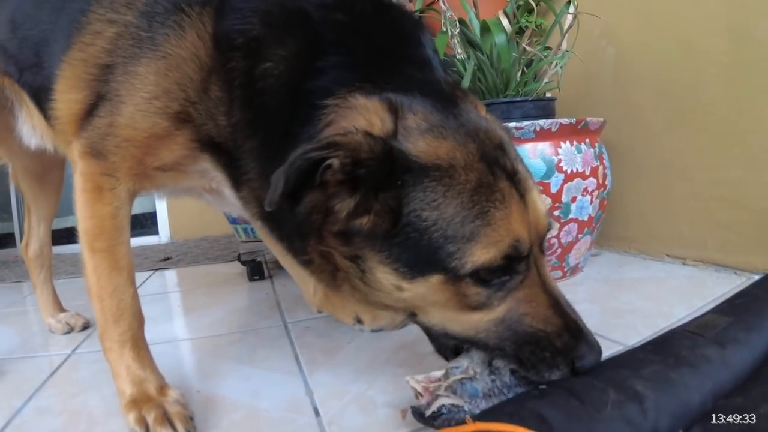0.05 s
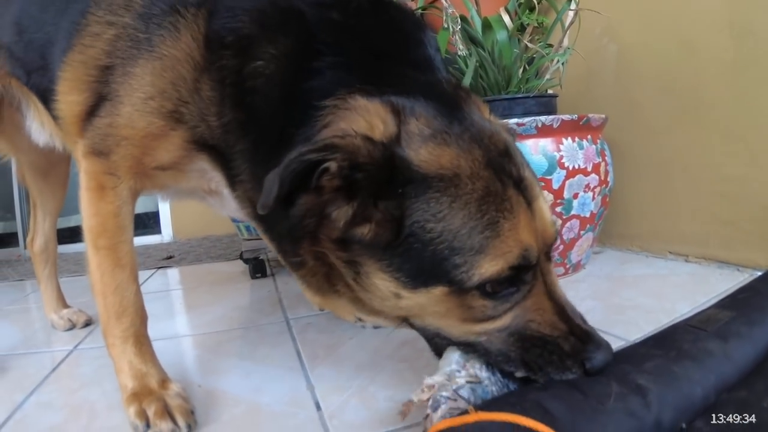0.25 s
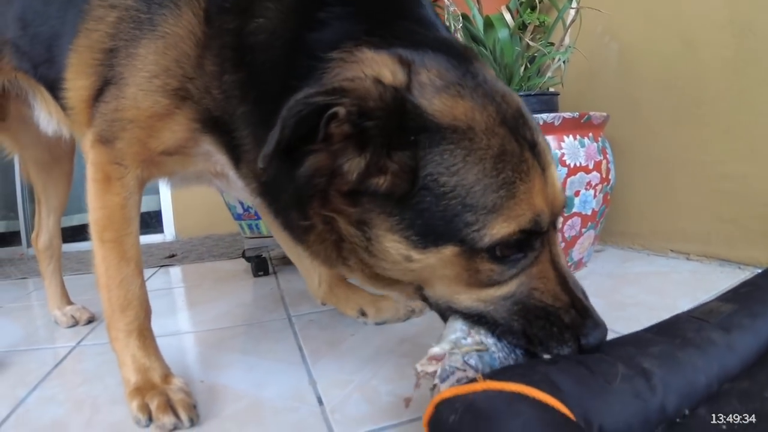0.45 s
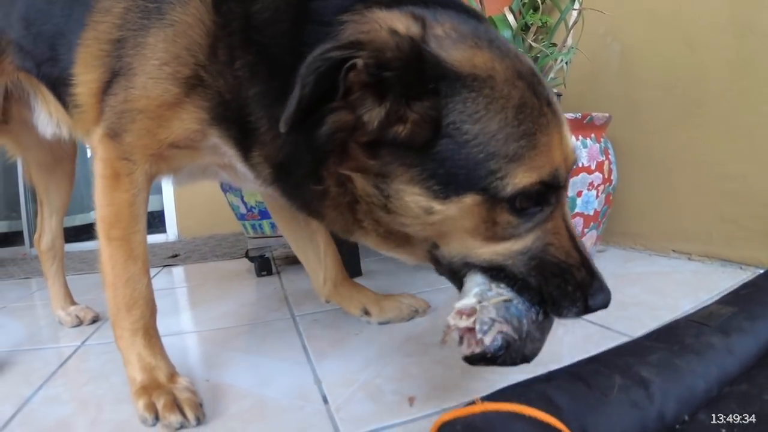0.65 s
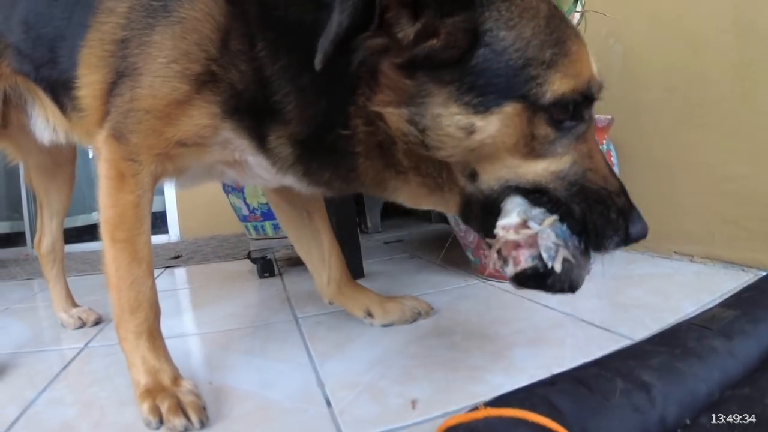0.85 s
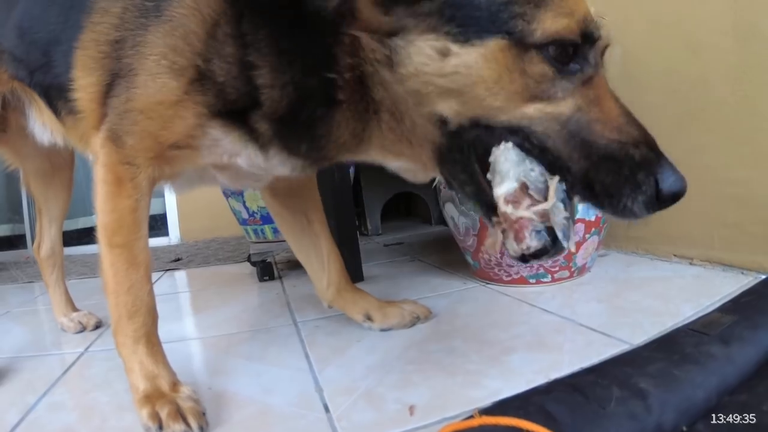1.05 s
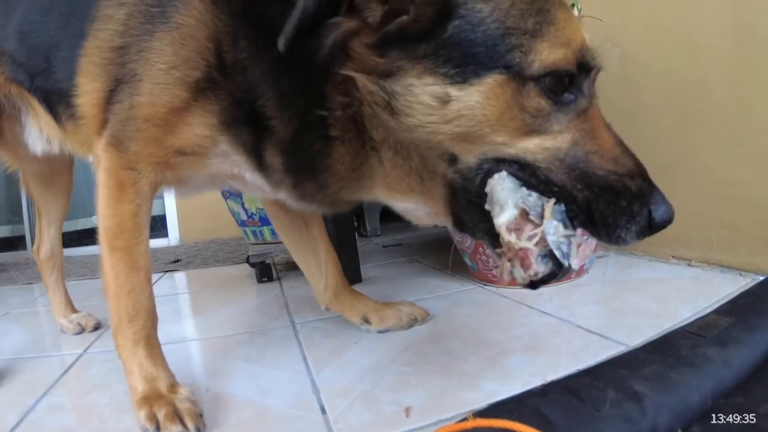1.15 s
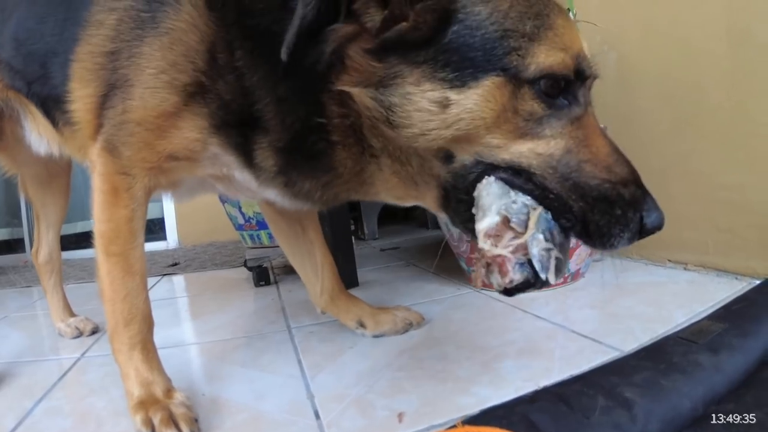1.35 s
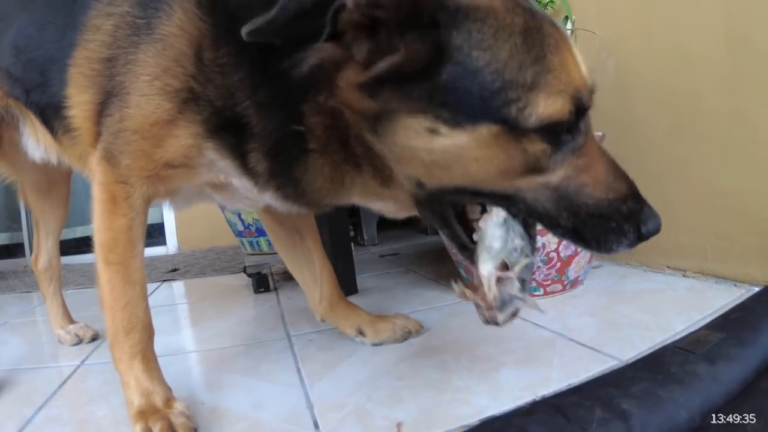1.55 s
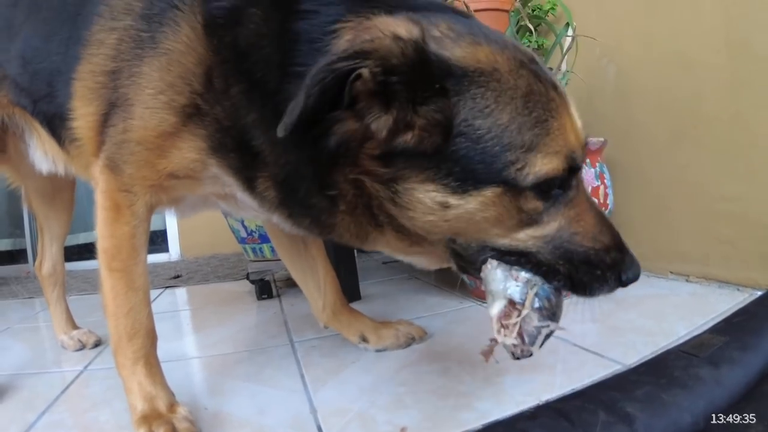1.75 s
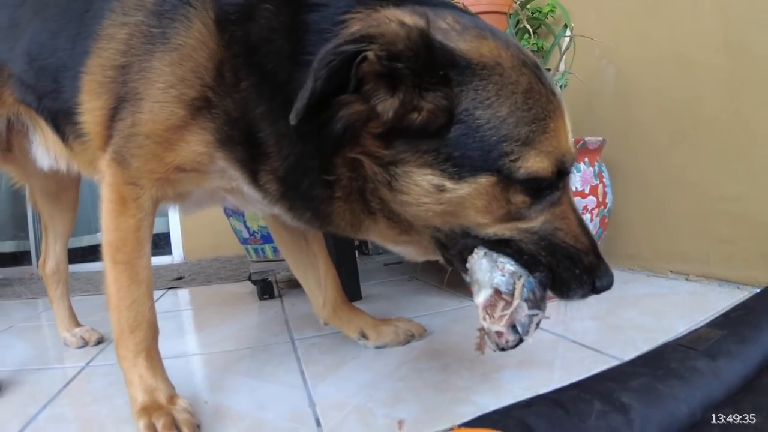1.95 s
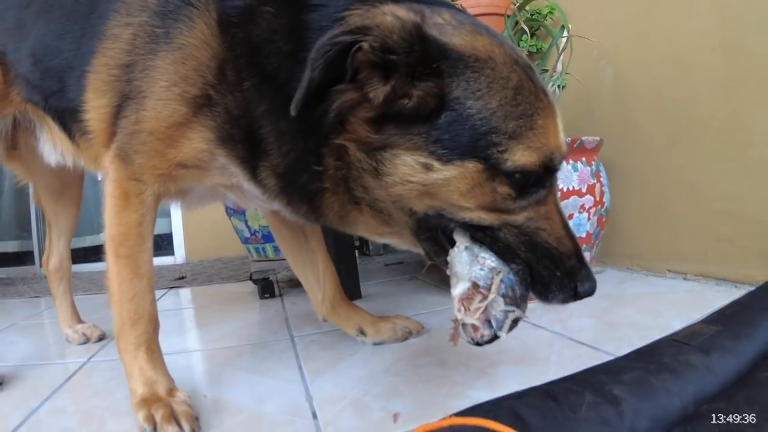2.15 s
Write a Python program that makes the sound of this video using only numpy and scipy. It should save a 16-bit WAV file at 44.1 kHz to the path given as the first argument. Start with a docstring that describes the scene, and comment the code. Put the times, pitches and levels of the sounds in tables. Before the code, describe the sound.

Close crunching and wet squelching as a dog chews through a raw fish.

```python
"""Dog crunching a raw fish

A dog chews a whole fish close by on a tiled patio, over outdoor air and a far hum. Each bite is a
brittle fracture of bone: a crack, a thud of jaw and flesh, and two damped resonances of the mouth.
Between bites wet flesh slides, tears and clicks. The walls reflect it; the hardest snaps clip."""
import sys
import numpy as np
from scipy import signal
from scipy.fft import rfft, irfft, next_fast_len
from scipy.io import wavfile

SR = 44100
rng = np.random.default_rng(int(sys.argv[2]) if len(sys.argv) > 2 else 0)


def put_to_file(sound):
    """Save the sound as 16-bit audio at rate SR, in the file named by the first command-line argument."""
    columns = np.atleast_2d(sound).T  # one column per channel
    safe = np.clip(columns, -1, 1)
    whole_steps = np.round(safe * 32767)
    wavfile.write(sys.argv[1], SR, whole_steps.astype(np.int16))


N = 97020
T = np.arange(N) / SR


def amp(db):
    """Decibels to amplitude ratio."""
    return 10 ** (np.asarray(db) / 20)


def unit(x):
    """Normalisation to rms 1."""
    return x / np.sqrt(np.mean(x ** 2) + 1e-20)


def along(points, hz):
    """Interpolation on a logarithmic frequency axis."""
    knots_hz, values = np.transpose(points)
    return np.interp(np.log(hz + 1), np.log(knots_hz + 1), values)


def curves(rows):
    """Linear interpolation in time of each column after the first."""
    times, *columns = np.transpose(rows)
    return [np.interp(T, times, column) for column in columns]


def fade(t, t60):
    """Exponential decay by 60 dB in t60 seconds."""
    return np.exp(-np.log(1000) * t / t60)


def burst(t, rise_s, hold_s, t60):
    """Transient envelope: attack, hold and exponential decay."""
    return (1 - np.exp(-np.maximum(t, 0) / rise_s)) * fade(np.maximum(t - hold_s, 0), t60)


def bell(hz, centre_hz, octaves):
    """A resonance peak, Gaussian in log frequency."""
    return np.exp(-.5 * (np.log2((hz + 1) / centre_hz) / octaves) ** 2)


def filtered(x, response):
    """Linear filtering: the spectrum times a frequency response."""
    size = next_fast_len(len(x) + SR // 4)
    return irfft(rfft(x, size) * response(np.fft.rfftfreq(size, 1 / SR)), size)[:len(x)]


def colour(x, spectrum):
    """Spectral shaping, at rms 1."""
    return unit(filtered(x, lambda hz: amp(along(spectrum, hz))))


def tilted(x, db_per_octave):
    """A spectral slope above 500 Hz, at rms 1."""
    return unit(filtered(x, lambda hz: amp(db_per_octave * np.log2(np.maximum(hz, 500) / 500))))


def grains(per_s, spectrum, size=N):
    """Shot noise: tiny ruptures of random time and strength."""
    return colour((rng.random(size) < per_s / SR) * rng.standard_normal(size), spectrum)


def ring(t, hz, db, t60, rise_s=0.00042):
    """One mode of vibration: a damped sinusoid."""
    return amp(db) * np.sin(2 * np.pi * hz * t) * burst(t, rise_s, 0, t60)


def add(track, start_s, x):
    """Superposition of x on the track from start_s."""
    part = track[max(round(start_s * SR), 0):][:len(x)]
    part += x[:len(part)]


# Spectrum of outdoor air: frequency_hz, gain_db
AIR_SPECTRUM = [(15, -60), (25, -25), (64, -23), (200, -9), (373, -13.5), (439, -14.5), (659, -19.5),
                (887, -18), (962, -34), (2220, -35), (7310, -36), (8830, -33), (16000, -35.5)]


def air():
    """Stationary broadband noise: outdoor air, strongest at low frequencies."""
    return amp(-49) * colour(rng.standard_normal(N), AIR_SPECTRUM)


# Tones of distant machinery: pitch_hz, level_db
HUM_TONES = [(120, -55.5), (135, -56), (236, -54)]


def hum(bandwidth_hz=9.5):
    """Narrowband noise: neighbouring frequencies beat, so each machine tone wavers."""
    out = np.zeros(N)
    for pitch_hz, level_db in HUM_TONES:
        noise = rng.standard_normal(N)
        band = filtered(noise, lambda hz: 1 / (1 + (2 * (hz - pitch_hz) / bandwidth_hz) ** 2))
        out += amp(level_db) * unit(band)
    return out


# Reverberation time of the patio: frequency_hz, t60_s
TAIL_DECAY = [(150, 0.77), (400, 0.3), (1000, 0.42), (4000, 0.33), (14000, 0.22)]


def diffuse_response():
    """Diffuse impulse response: dull nearby scatter and a tail whose decay depends on frequency."""
    hz, frame_s, spectra = signal.stft(rng.standard_normal(SR // 3), SR, nperseg=256)
    tail = signal.istft(spectra * fade(frame_s, along(TAIL_DECAY, hz)[:, None]), SR)[1]
    t = T[:len(tail)]
    build_up = 1 - np.exp(-(t / 0.0047) ** 2)
    tail *= build_up
    near = filtered(rng.standard_normal(len(t)), lambda hz: 1 / (1 + 1j * hz / 5060))
    near *= fade(t, t60=0.12) * build_up
    return amp(-11.5) * tail / np.linalg.norm(tail) + amp(-12) * near / np.linalg.norm(near)


# Frequency response of the diffuse field: frequency_hz, gain_db
REVERB_SPECTRUM = [(100, -17), (250, -0.5), (700, 0.5), (1500, -7.5), (4000, -3.5), (14000, 5)]


def reverberation(x, span_s=0.11):
    """Diffuse reverberation: a fresh random tail per span keeps it smooth, without steady ringing."""
    wash, span = np.zeros(N), round(span_s * SR)
    for i in range(0, N, span):
        add(wash, i / SR, signal.fftconvolve(x[i:i + span], diffuse_response()))
    return filtered(wash, lambda hz: amp(along(REVERB_SPECTRUM, hz)))


# Early reflections from the walls: delay_s, gain_db
REFLECTIONS = [(.0095, -25.5), (.0128, -16.5), (0.0175, -14), (0.0254, -19.5)]


def wall_echoes(x, cutoff_hz=1110):
    """Specular reflection: each wall returns a delayed, low-passed copy."""
    def response(hz):
        paths = sum(amp(db) * np.exp(-2j * np.pi * hz * delay_s) for delay_s, db in REFLECTIONS)
        return paths / (1 + 1j * hz / cutoff_hz)
    return filtered(x, response)


# Spectrum of soft flesh: frequency_hz, gain_db
FLESH_SPECTRUM = [(80, -30), (200, -12.5), (500, 0.5), (800, -2), (1400, -5.5), (2400, -7.5), (5000, -30.5),
                  (16000, -55)]
# Movement of muzzle and fish: time_s, level_db
SHUFFLE_LEVELS = [(0, -46.5), (.11, -51), (.2, -56.5), (.5, -32.5), (.65, -47.5), (.76, -56), (.85, -63.5),
                  (1.35, -56), (1.62, -57.5), (1.75, -52), (2.0, -61.5), (2.2, -54)]


def shuffle():
    """Friction noise: muzzle and fish shuffle in many soft, dull contacts."""
    level_db, = curves(SHUFFLE_LEVELS)
    return amp(level_db) * grains(per_s=2600, spectrum=FLESH_SPECTRUM)


# Spectrum of the wet hiss: frequency_hz, gain_db
SALIVA_SPECTRUM = [(300, 0.5), (1000, -1.5), (2000, -2), (6000, -1.5), (9000, -4), (12000, -11.5),
                   (16000, -12.5)]
# Slippery skin sliding in the mouth: time_s, hiss_db, resonance_db, resonance_hz
SLIDE_PATH = [(0, -49.5, -60, 3400), (.13, -51.5, -64, 3930), (.21, -48, -61, 6500), (.5, -42, -45, 5230),
              (.7, -58.5, -60.5, 5160), (.86, -60.5, -68, 5220), (1.075, -51, -55.5, 5700),
              (1.1, -50, -45, 5300), (1.145, -56.5, -49.5, 3620), (1.185, -45.5, -51, 3500),
              (1.27, -52.5, -58, 5600), (1.32, -68, -70, 4440), (1.375, -59, -69, 4120),
              (1.44, -42, -39, 4400), (1.49, -46, -52, 4200), (1.6, -49, -56.5, 4120),
              (1.77, -50, -51, 3300), (2.04, -44, -53, 4480), (2.2, -59.5, -58, 5400)]


def slide():
    """Wet friction: skin hisses, and a cavity resonance moves with the jaw."""
    hiss_db, resonance_db, resonance_hz = curves(SLIDE_PATH)
    hz, frame_s, spectra = signal.stft(rng.standard_normal(N), SR, nperseg=256)
    peak = bell(hz[:, None], np.interp(frame_s, T, resonance_hz), octaves=0.19)
    resonance = unit(signal.istft(spectra * peak, SR)[1][:N])
    hiss = grains(per_s=6000, spectrum=SALIVA_SPECTRUM)
    return amp(hiss_db) * hiss + amp(resonance_db) * resonance


# Spectrum of rupturing fibres and scales: frequency_hz, gain_db
CRACKLE_SPECTRUM = [(300, -36), (1000, 4.5), (1900, -6), (3500, 1.5), (6000, 0), (9000, -1.5),
                    (13000, -7.5), (16000, -14)]
# Tearing, squelching flesh: start_s, hold_s, crackle_db, flesh_db, crackle_tilt_db_per_octave
FLESH_TEARS = [(0.1411, 0.0087, -33.5, -29.5, -2), (0.263, 0.013, -44, -34, -18),
               (0.497, 0.023, -37, -40.5, 10), (0.519, 0.0034, -34, -20.5, -1.5),
               (0.529, .015, -28.5, -25.5, 4), (0.544, 0.024, -29.5, -25.5, 6.5),
               (0.568, 0.015, -31, -24, 3), (0.633, 0.007, -33, -37.5, -2), (.884, 0.016, -38, -41, 3.5),
               (0.916, 0.0094, -35, -44, -1), (1.41, 0.013, -40, -48, -1), (1.431, 0.019, -31, -51, -0.1),
               (2.094, 0.022, -38.5, -49, 1.3)]


def tears(fibres_per_s=2600):
    """Cascading rupture: fibres and scales give way, a bright crackle over duller pops of flesh."""
    crackle = grains(fibres_per_s, CRACKLE_SPECTRUM)
    flesh = grains(fibres_per_s, FLESH_SPECTRUM)
    out = np.zeros(N)
    for start_s, hold_s, crackle_db, flesh_db, tilt in FLESH_TEARS:
        envelope = burst(T - start_s, rise_s=0.0013, hold_s=hold_s, t60=0.036)
        out += envelope * (amp(crackle_db) * tilted(crackle, tilt) + amp(flesh_db) * flesh)
    return out


# Clicks of tongue, lips and gristle: start_s, pitch_hz, level_db, t60_s
WET_CLICKS = [(0.027, 3760, -32, 0.007), (0.065, 1980, -39, 0.0068), (0.1048, 433, -29, 0.026),
              (.1685, 7500, -39, .004), (.711, 1700, -31, 0.011), (0.715, 5200, -31, .008),
              (.817, 8700, -35, 0.0037), (.889, 760, -29, 0.024), (1.215, 2530, -23, 0.015),
              (1.2142, 4740, -29, 0.0054), (1.224, 2650, -30, .01), (1.4263, 5100, -18, 0.0067),
              (1.4365, 4420, -27, 0.0055), (1.444, 6240, -24, .008), (1.589, 635, -30, 0.016),
              (1.991, 9100, -29, 0.0044), (2.037, 2005, -31, 0.0076), (2.079, 2100, -25, 0.0077),
              (2.1032, 2010, -18, 0.022), (2.11, 10500, -25, .005), (2.182, 5140, -30, 0.0069)]


def clicks(rise_s=0.00042, grit_db=-12, froth_db=-5):
    """Cavity resonance: a small air pocket rings, with broadband grit and froth around its pitch."""
    out, t = np.zeros(N), T[:SR // 16]
    for start_s, pitch_hz, level_db, t60 in WET_CLICKS:
        pocket = ring(t, pitch_hz, level_db, t60)
        grit = colour(rng.standard_normal(len(t)), CRACKLE_SPECTRUM) * burst(t, rise_s, 0, t60)
        band = filtered(rng.standard_normal(len(t)), lambda hz: bell(hz, pitch_hz, octaves=0.31))
        froth = unit(band) * burst(t, rise_s, 0, t60=0.016)
        add(out, start_s, pocket + amp(level_db + grit_db) * grit + amp(level_db + froth_db) * froth)
    return out


# Spectrum of splintering bone: frequency_hz, gain_db
CRACK_SPECTRUM = [(100, -34), (300, 8.5), (1000, 0.5), (1400, -2), (2700, 3.5), (4500, -0.5), (6500, -5.5),
                  (9000, -5.5), (11000, -15.5), (16000, -19.5)]
# Bone fractures: start_s, crack_db, crack_length_s, crack_tilt_db_per_octave, thud_hz, thud_db,
# low_mode_hz, low_mode_db, high_mode_hz, high_mode_db
BONE_SNAPS = [(0.1314, -41, 0.0024, -2, 268, -13, 390, -22, 1710, -39),
              (0.2463, -7, 0.0041, 0, 255, -5.5, 899, 6.5, 2167, 2),
              (0.378, -18.5, 0.0012, 1, 406, -13.5, 715, -9, 3800, -19),
              (0.387, -9, 0.0034, 0.2, 395, 2, 778, 1.5, 2060, -8),
              (.4631, -17.5, 0.006, 0.4, 413, -6, 688.5, -2.5, 3090, -5.5),
              (0.6011, -34.5, 0.015, -3, 202, -4, 545, -7.5, 1340, -12.5),
              (.6050, -23, 0.00099, -5, 263, -11.5, 505, -6.5, 2430, -20),
              (0.922, -18, 0.0029, 4, 277, -18.5, 1194, -8, 2090, -10),
              (1.4197, -29, 0.00084, 8, 255, -34, 1083, -18.5, 2110, -18),
              (1.7823, -6.5, 0.0031, -1.35, 288, -1.5, 565, 1.5, 1752, 3.5),
              (1.8880, -11.5, .002, -1, 451, -0.5, 1124, -13.5, 2030, -1.5)]


def snaps(sag_db_per_s=1306):
    """Brittle fracture: bone splinters, hardest at first, thumps the jaw and excites two mouth modes."""
    out, t = np.zeros(N), T[:SR // 16]
    for start_s, crack_db, length_s, tilt, *modes in BONE_SNAPS:
        thud_hz, thud_db, low_hz, low_db, high_hz, high_db = modes
        envelope = burst(t, rise_s=0.0001, hold_s=length_s, t60=0.0087)
        envelope *= amp(-sag_db_per_s * (t - length_s / 2))
        splinters = tilted(grains(per_s=7000, spectrum=CRACK_SPECTRUM, size=len(t)), tilt)
        # The envelope sets the energy, wherever the splinters fall.
        crack = unit(splinters * envelope) * np.sqrt(np.mean(envelope ** 2))
        thud = -ring(t, thud_hz, thud_db, t60=0.018)
        mouth = ring(t, low_hz, low_db, t60=0.017) + ring(t, high_hz, high_db, t60=0.013)
        add(out, start_s, amp(crack_db) * crack + thud + mouth)
    return out


def scene():
    """Direct, reflected and ambient sound add; the chewing is steeply cut below 175 Hz and carries little bass."""
    chewing = snaps() + clicks() + tears() + slide() + shuffle()
    low_cut = signal.butter(3, 175, "high", fs=SR, output="sos")
    dog = signal.sosfilt(low_cut, chewing)
    return (dog + wall_echoes(dog) + reverberation(dog) + air() + hum())[None]


def record(dry, ceiling=0.88, top_hz=16100):
    """Overload and band limiting: the recorder clips the hardest snaps and cuts the highest treble."""
    clipped = np.clip(dry[0], -ceiling, ceiling)
    return filtered(clipped, lambda hz: hz < top_hz)[None]


dry = scene()
out = record(dry)
put_to_file(out)
```